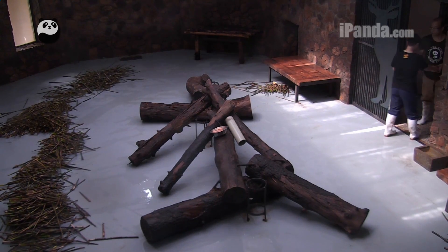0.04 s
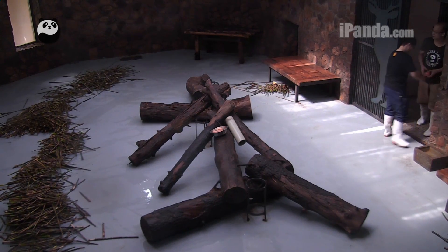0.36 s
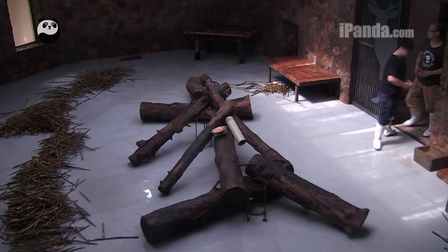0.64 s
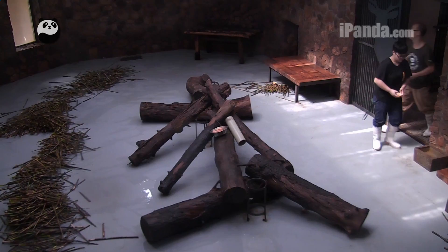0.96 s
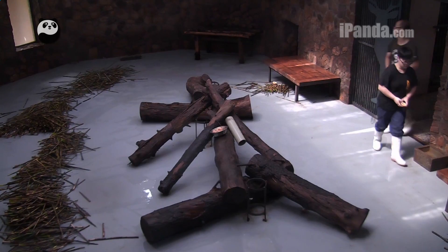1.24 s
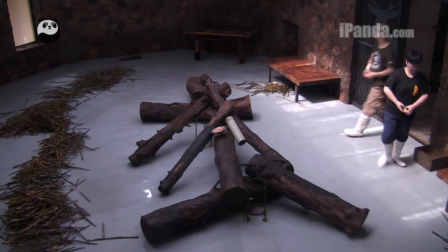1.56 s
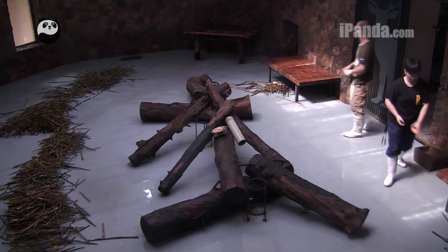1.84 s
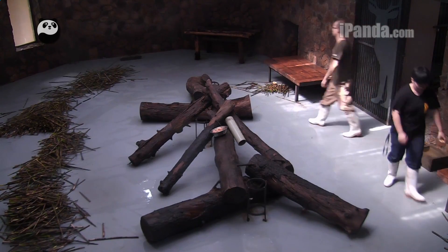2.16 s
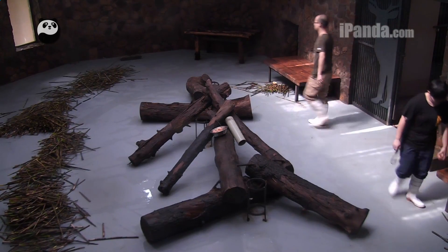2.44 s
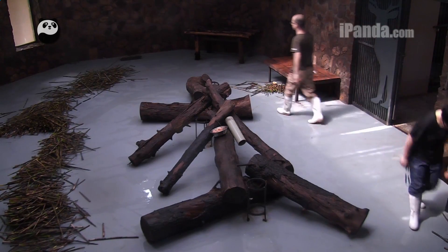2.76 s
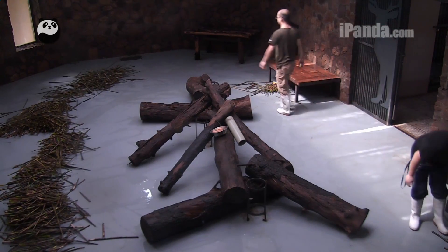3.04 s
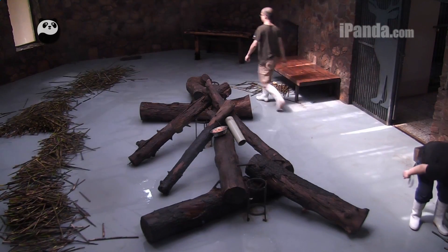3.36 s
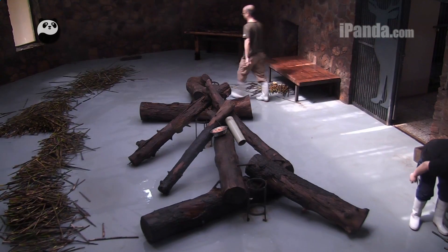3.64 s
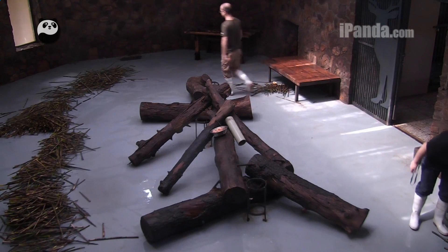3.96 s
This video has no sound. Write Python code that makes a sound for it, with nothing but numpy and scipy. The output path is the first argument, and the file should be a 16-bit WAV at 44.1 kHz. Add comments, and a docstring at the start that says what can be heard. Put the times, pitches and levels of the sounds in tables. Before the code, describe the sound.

A barred metal gate clanks shut, then a few footsteps, over steady ventilation noise.

```python
"""In a hard-walled animal enclosure, ventilation drones: broad air noise over duct resonances.
Metal clicks at a barred gate, which rubs as it swings shut, then clanks and rattles against its
frame, the impacts exciting the modes of its bars. Two keepers' boots tap and scuff across the floor,
heavy contacts thud, and the room reverberates. A security camera microphone saturates unevenly on
the peaks and passes only a narrow band."""
import sys
import numpy as np
from scipy import signal
from scipy.fft import rfft, irfft
from scipy.io import wavfile

SR = 44100
rng = np.random.default_rng(int(sys.argv[2]) if len(sys.argv) > 2 else 0)


def transcribe(u):
    """Save the signal u as a 16-bit wav file named by the first command-line argument.

    u: samples, shape (n,) or (channels, n), limited to [-1, 1]; the rate is SR.
    q: integer samples, one column per channel.
    """
    v = np.clip(np.atleast_2d(u).T, -1, 1)
    q = np.round(v * 32767).astype(np.int16)
    wavfile.write(sys.argv[1], SR, q)


N = 176400


def amp(db):
    """Amplitude ratio of a level in decibels."""
    return 10 ** (np.asarray(db) / 20)


def unit(x):
    """Normalisation to rms 1."""
    return x / np.sqrt(np.mean(x ** 2) + 1e-20)


def read(points, hz):
    """Interpolation on a log-frequency axis."""
    f, value = np.transpose(points)
    return np.interp(np.log(hz + 1), np.log(f + 1), value)


def level(points):
    """Gain curve interpolated through (time [s], level [dB]) points."""
    return amp(np.interp(np.arange(N) / SR, *np.transpose(points)))


def add(mix, start_s, sound):
    """Superposition of a delayed sound on the mix."""
    part = mix[round(start_s * SR):][:len(sound)]
    part += sound[:len(part)]


def noise(spectrum, tilt_db=0):
    """Spectrally shaped noise, tilted by tilt_db per octave from 1 to 7 kHz."""
    hz = np.fft.rfftfreq(N, 1 / SR)
    octaves = np.log2(np.clip(hz, 1000, 7000))
    gain = amp(read(spectrum, hz) + tilt_db * octaves)
    return unit(irfft(rfft(rng.standard_normal(N)) * gain, N))


def band(centre_hz, half_width_hz):
    """Resonance driven by noise: a Lorentzian peak in the spectrum."""
    hz = np.fft.rfftfreq(N, 1 / SR)
    detuning = (hz - centre_hz) / half_width_hz
    return unit(irfft(rfft(rng.standard_normal(N)) / (1 + detuning ** 2), N))


def burst(decay_s, attack_s):
    """Contact envelope: exponential rise, Gaussian decay."""
    t = np.arange(SR // 2) / SR
    return (1 - np.exp(-t / attack_s)) * np.exp(-.5 * (t / decay_s) ** 2)


# Air noise spectrum (frequency [Hz], relative level [dB])
AIR_SPECTRUM = [(20, -20.5), (48, -24.5), (66, -25), (85, -11.5), (115, -6.5), (160, -1.5), (230, 2),
                (350, -2), (520, -3), (700, -9), (880, -8.5), (1020, -6.5), (1350, -9), (1700, -13),
                (2700, -15), (4300, -15.5), (5200, -20.5), (6000, -26.5)]
# Fan and duct resonances (frequency [Hz], half-width [Hz], level [dB])
DUCT_MODES = [(77.4, 3.4, -40), (98, 11, -42.5), (162.7, 6, -31), (198, 5, -29), (234.4, 13, -33),
              (625.6, 8, -36), (797.5, 12, -38.5), (970, 6.9, -41.5), (953.7, 6.2, -33.5)]
# Slow drift of the ventilation (time [s], gain [dB])
VENT_DRIFT = [(0, -1.5), (1.1, -1.9), (1.6, -0.5), (2.3, -0.75), (2.8, -0.06), (3.4, 0.1), (4, -1)]
def ventilation(air_db=-16.5):
    """Broadband flow noise, with a hum from narrow fan and duct resonances."""
    hum = sum(amp(db) * band(hz, width) for hz, width, db in DUCT_MODES)
    return (amp(air_db) * noise(AIR_SPECTRUM) + hum) * level(VENT_DRIFT)


# Latch resonances (frequency [Hz], half-width [Hz], relative level [dB])
LATCH_MODES = [(3020, 730, 4.5), (4220, 360, 1), (5200, 550, -6.5)]
def latch(start_s=.7885, click_db=-12, ring_db=-30, room_db=-4, attack_s=.0006):
    """Damping in a small metal impact: broad resonances click, a narrow one rings on."""
    click, ring = np.zeros((2, N))
    short, long = burst(.0055, attack_s), burst(.09, attack_s)
    metal = unit(sum(amp(db) * band(hz, width) for hz, width, db in LATCH_MODES))
    add(click, start_s, amp(click_db) * short * metal[:len(short)])
    add(ring, start_s, amp(ring_db) * long * band(4180, 90)[:len(long)])
    return click + ring + amp(room_db) * room(click)


# Reverberation of the enclosure (frequency [Hz], time to fall 60 dB [s])
ROOM_T60 = [(100, 0.82), (1000, 2.6), (2500, 2.01), (4500, 2.18), (6500, 1.37)]
def room(x, build_s=.0082):
    """Reverberation: a diffuse field builds up, then decays exponentially at each band's own rate."""
    hz, t, field = signal.stft(rng.standard_normal(2 * SR), SR, nperseg=256)
    field = field * amp(-60 * t / read(ROOM_T60, hz)[:, None])
    tail = signal.istft(field * (1 - np.exp(-t / build_s)), SR, nperseg=256)[1]
    return signal.fftconvolve(x, tail / np.linalg.norm(tail))[:N]


# Rubbing of the swinging gate (time [s], level [dB])
SWING_RUB = [(1.15, -54), (1.35, -32), (1.48, -24), (1.56, -31), (1.62, -68)]
# Blows on the frame (time [s], level [dB], decay [s], tilt [dB/octave])
GATE_IMPACTS = [(1.564, -11, 0.019, 6), (1.577, -8, 0.028, 2.5), (1.601, -7, 0.0093, -2),
                (1.61, -12.5, .03, -7.5), (1.656, -12.5, .03, -2.5), (2.079, -13.5, 0.056, 8),
                (2.104, -17, 0.016, -6)]
# Clatter spectrum (frequency [Hz], relative level [dB])
CLATTER_SPECTRUM = [(100, -22.5), (700, -30.5), (1300, -9.5), (1800, -6), (2050, -1), (2350, 4),
                    (3000, 1.5), (3400, -3), (4500, 1.5), (5300, -5.5), (6200, -15.5)]
# Modes of the bars (frequency [Hz], relative level [dB], time to fall 60 dB [s])
BAR_MODES = [(2217, -3.5, 1.3), (2337, 3.5, 1), (2326, -23.5, 1), (2499, -11.5, .8), (2670, -1.5, .8),
             (3136, -3, 1), (4489, -6, 3.6), (4280, 6, 1), (4520, 3.5, .9)]
def gate(direct_db=-1, room_db=1, ring_db=-13, attack_s=.0011, chatter_hz=177, chatter_db=2):
    """Friction as the gate swings shut, then impacts that excite the damped modes of its bars."""
    rub = band(centre_hz=4600, half_width_hz=920) * level(SWING_RUB)
    clatter = np.zeros(N)
    for s, db, decay_s, tilt_db in GATE_IMPACTS:
        shape = burst(decay_s, attack_s)
        add(clatter, s, amp(db) * shape * noise(CLATTER_SPECTRUM, tilt_db)[:len(shape)])
    # The loose bars chatter, modulating the amplitude.
    clatter *= unit(amp(chatter_db * band(chatter_hz, chatter_hz / 2)))
    t = np.arange(SR) / SR
    bars = sum(amp(db - 60 * t / t60) * np.sin(2 * np.pi * (hz * t + rng.random()))
               for hz, db, t60 in BAR_MODES)
    ring = unit(signal.fftconvolve(clatter, bars)[:N]) * clatter.std()
    return rub + amp(direct_db) * clatter + amp(room_db) * room(clatter) + amp(ring_db) * ring


# Heavier blows of gate and boots (time [s], level [dB])
HEAVY_CONTACTS = [(1.566, -25), (2.08, -35), (3.302, -36), (3.82, -45)]
def thuds(hz=38, decay_s=.02, attack_s=.004):
    """Each heavy contact drives a strongly damped low-frequency oscillation."""
    out, shape = np.zeros(N), burst(decay_s, attack_s)
    pulse = shape * np.sin(2 * np.pi * hz * np.arange(len(shape)) / SR)
    for s, db in HEAVY_CONTACTS:
        add(out, s, amp(db) * pulse)
    return out


# Boot strikes (time [s], level [dB], decay [s], tilt [dB/octave], room gain [dB])
BOOT_IMPACTS = [(2.769, -13.5, 0.011, -10, -11.5), (3.305, -10, 0.017, -0.5, 1), (3.368, -13.5, .018, 2, 0),
                (3.823, -11.5, 0.016, -3, -1)]
# Boot tap spectrum (frequency [Hz], relative level [dB])
TAP_SPECTRUM = [(100, -25.5), (900, -22), (1600, -13.5), (2100, -4.5), (2550, 2), (2950, -5.5),
                (3300, -3.5), (4100, -11), (4650, -5.5), (6200, -15.5)]
def taps(attack_s=.0016):
    """Impact noise: brief contact of boot and hard floor radiates a broadband slap."""
    direct, to_room = np.zeros((2, N))
    for s, db, decay_s, tilt_db, room_db in BOOT_IMPACTS:
        shape = burst(decay_s, attack_s)
        grit = unit(np.tanh(2 * noise(TAP_SPECTRUM, tilt_db)))  # saturation evens the grain
        slap = amp(db) * shape * grit[:len(shape)]
        add(direct, s, slap)
        add(to_room, s, amp(room_db) * slap)
    return direct + room(to_room)


# Sliding soles (time [s], level [dB], decay [s], centre frequency [Hz])
SOLE_SLIDES = [(3.076, -18.5, .06, 990), (3.116, -18.5, 0.077, 1020), (3.429, -28, 0.074, 1150),
               (3.615, -18, 0.058, 490)]
def scuffs(half_width_hz=150, attack_s=.0088, room_db=-2):
    """Sliding friction of rubber on the floor gives a dull, hollow band of noise."""
    out = np.zeros(N)
    for s, db, decay_s, hz in SOLE_SLIDES:
        shape = burst(decay_s, attack_s)
        add(out, s, amp(db) * shape * band(hz, half_width_hz)[:len(shape)])
    return out + amp(room_db) * room(out)


def scene():
    """Superposition of all sources at one microphone."""
    return (ventilation() + latch() + gate() + thuds() + taps() + scuffs())[None]


def record(dry, low_cut_hz=35, notch_hz=(3570, 3950), high_cut_hz=6060, clip_at=.73, edge_hz=15800):
    """Nonlinear distortion and band limiting: asymmetric saturation, filters, then hard clipping."""
    ceiling = np.where(dry > 0, .41, 1.55)  # positive half-waves saturate first
    saturated = ceiling * np.tanh(dry / ceiling)
    bass_cut = signal.butter(2, low_cut_hz, "high", fs=SR, output="sos")
    passband = signal.firwin(601, [*notch_hz, high_cut_hz], window=("kaiser", 6), fs=SR)
    narrow = signal.oaconvolve(signal.sosfilt(bass_cut, saturated), passband[None], "same")
    clipped = np.clip(narrow, -clip_at, clip_at)
    lowpass = signal.firwin(511, edge_hz, window=("kaiser", 9), fs=SR)
    return signal.oaconvolve(clipped, lowpass[None], "same")


dry = scene()
out = record(dry)
transcribe(out)
```